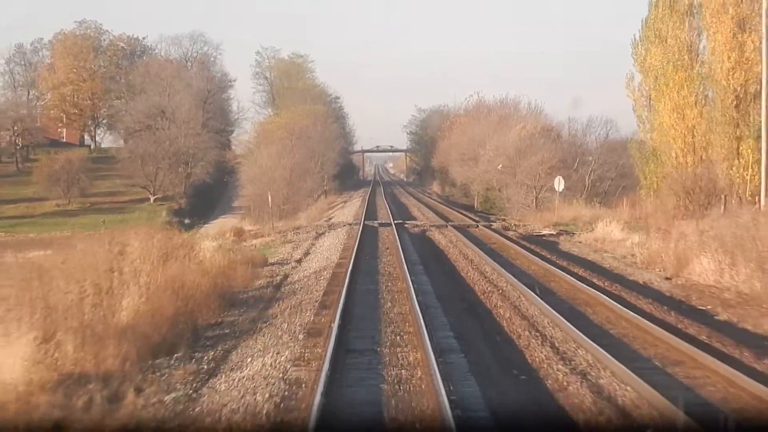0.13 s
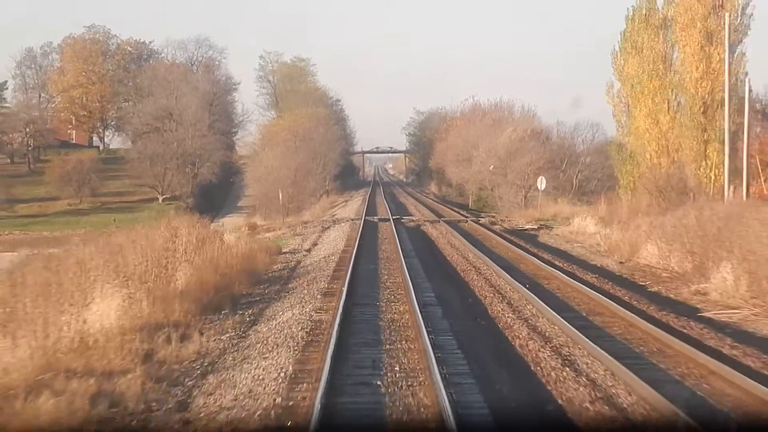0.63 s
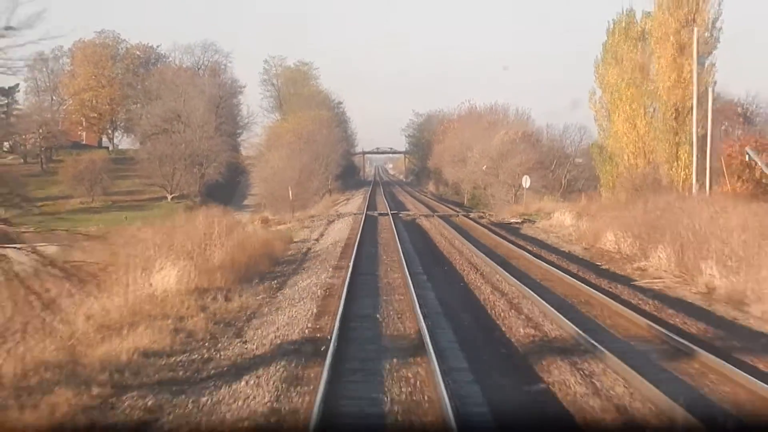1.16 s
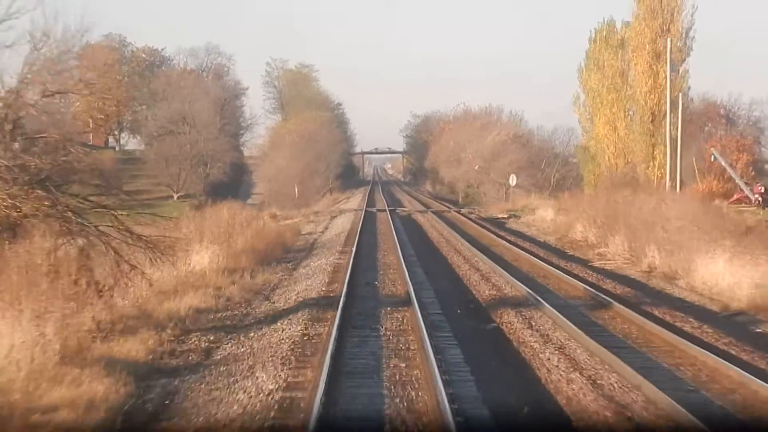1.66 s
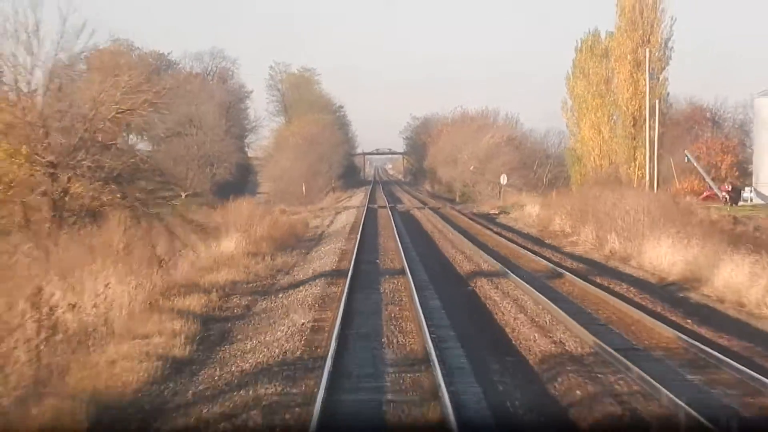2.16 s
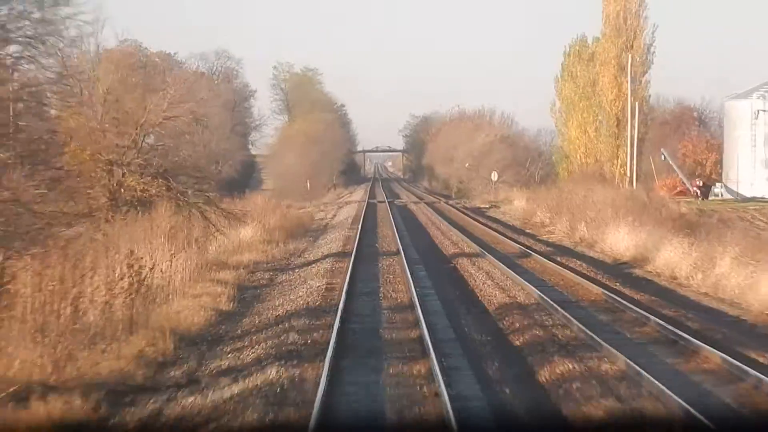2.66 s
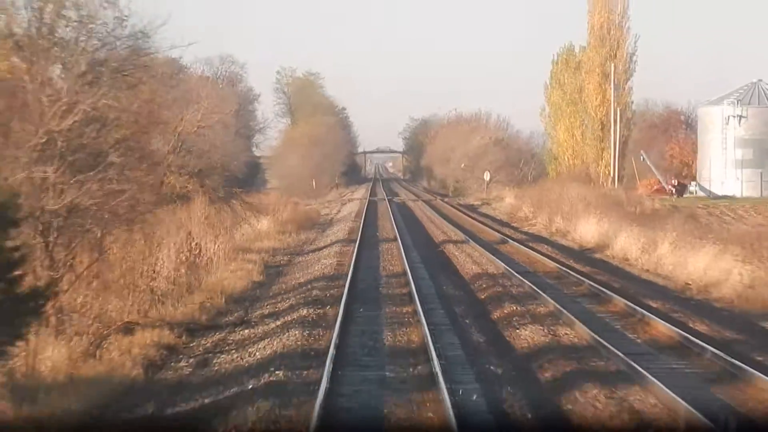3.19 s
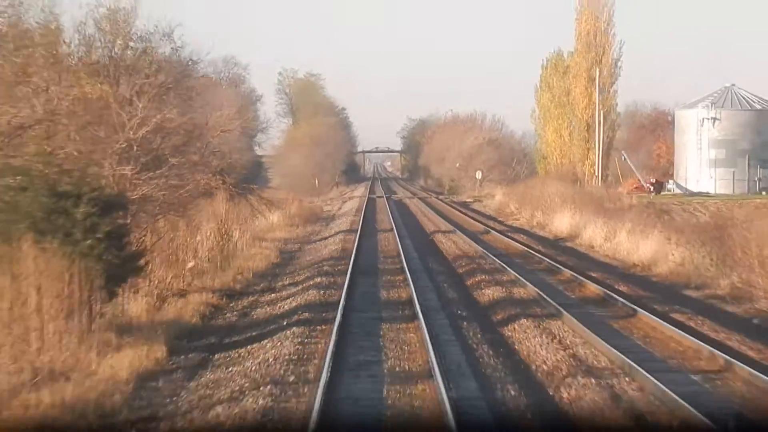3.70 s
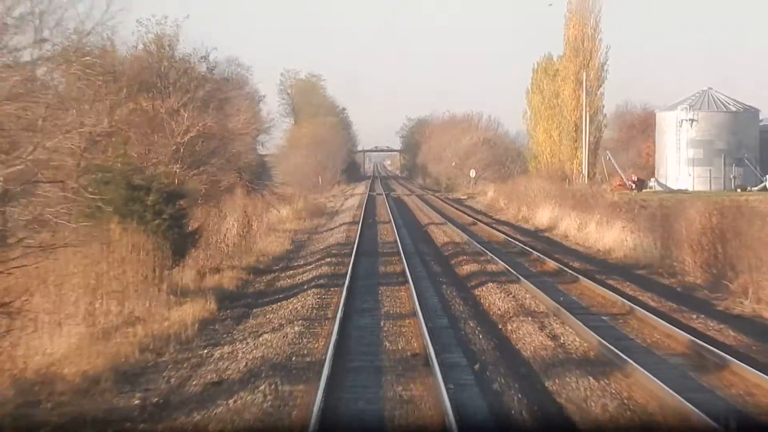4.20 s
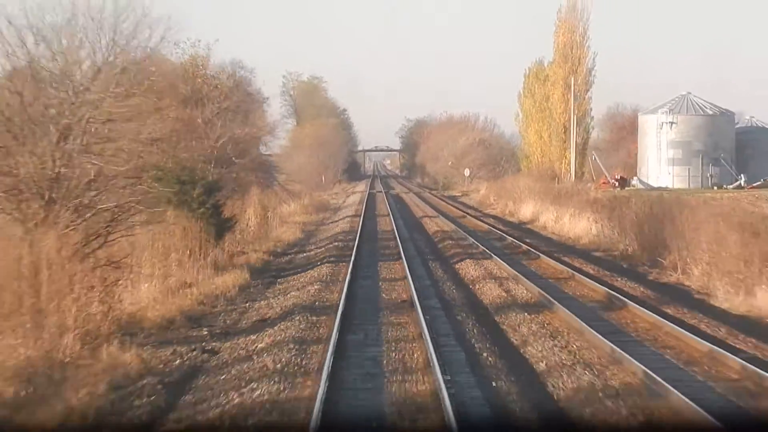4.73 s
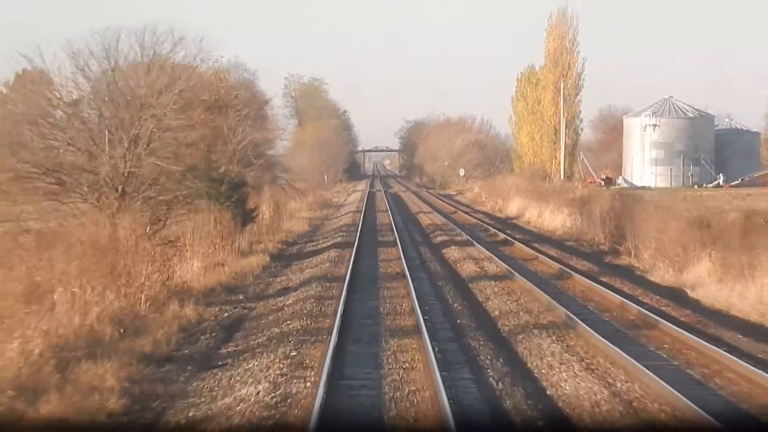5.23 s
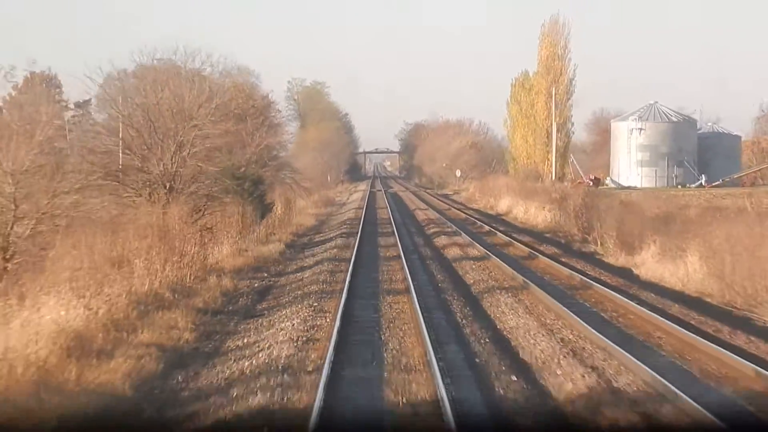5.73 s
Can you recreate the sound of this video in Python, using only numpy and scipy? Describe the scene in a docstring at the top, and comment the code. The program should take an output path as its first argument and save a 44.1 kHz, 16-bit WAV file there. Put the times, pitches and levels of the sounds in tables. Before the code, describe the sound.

Inside a moving passenger train car, a deep engine throb and boomy wheel roar continue under a wavering mid-pitched hum and soft low floor thumps.

```python
"""Inside a passenger car rolling on welded rail, heard in stereo for about six seconds.
From the start an underfloor engine throbs at fixed speed as a sum of sines, a gear hums as one wavering sine,
and wheel roar, shaped noise, comes through the booming floor and walls. From half a second on, jolts swing
the floor as short low bursts, and a peak limiter ducks after those above its ceiling; three faint ticks of
filtered noise fall among them. Past the middle the deepest throb sinks and returns; the hum swells to the end."""
import sys
import numpy as np
from scipy import signal
from scipy.fft import rfft, irfft
from scipy.io import wavfile

SR = 44100
rng = np.random.default_rng(int(sys.argv[2]) if len(sys.argv) > 2 else 0)


def wrap_up_sound(samples):
    """Save the sound to the file named by the first command line argument, as 16-bit audio."""
    columns = np.atleast_2d(samples).T
    # keep every value between -1 and 1, then stretch to whole-number steps
    tamed = np.clip(columns, -1, 1)
    steps = np.round(tamed * 32767).astype(np.int16)
    wavfile.write(sys.argv[1], SR, steps)


def decibels_to_gain(level_db):
    """Convert a level in decibels to a linear amplitude gain (20 dB per decade)."""
    exponent = np.asarray(level_db, float) / 20
    return 10 ** exponent


N = 258426  # samples

# wheel roar without body resonances: (frequency [Hz], relative spectral density [dB])
ROAR_SPECTRUM = [(15, -27), (45, -16.5), (80, -12.5), (160, -16.5), (220, -24), (320, -27), (400, -27),
                 (700, -29.5), (1250, -36), (1600, -34), (2100, -38.5), (2700, -44.5), (5500, -59),
                 (11000, -62), (13000, -65.5), (15000, -77), (16000, -84)]
# body resonances excited by the roar: (frequency [Hz], width [Hz], power added, relative to the roar [dB])
BODY_MODES = [(98.7, 18.8, 8.5), (127.6, 15.2, 6), (213.5, 6.7, -2), (268, 12.6, 6), (352.3, 18, 9.5),
              (400, 7.6, -1), (429.4, 10.5, 10.5), (440.3, 16, 9.5), (469, 34, 3.5), (498.4, 11.6, 7.5),
              (547, 8, 4), (773, 7, 6.5), (868, 49, 0.5), (941, 30, 5.5), (1036, 73, 3), (1417, 19, 7.5),
              (1475, 39, 3), (1920, 21, 7), (2064, 26, 4.5)]
# correlation of left and right roar ahead of the cabin: (frequency [Hz], likeness [0 to 1])
STEREO_LIKENESS = [(60, 1.0), (130, 0.98), (290, 0.94), (640, 1), (1410, 0.53), (2200, 0.13), (3100, 0.062),
                   (6820, 0.01), (15000, 0.03)]
ROAR_DB = -14  # mean rms level ahead of the stereo tilt
CABIN_T60_S, CABIN_DB = 0.3, -10  # decay time; tail energy against direct sound, ahead of its bass cut

# ticks of a loose fitting: (time [s], noise level at onset ahead of the band-pass [dB])
FITTING_TICKS = [(.665, -34), (1.83, -40), (3.55, -39)]

# swells added to the resting gear hum: (start [s], length [s], rms level of the full swell [dB])
GEAR_SWELLS = [(0.0, 0.49, -26.5), (0.617, 0.16, -26), (0.995, 0.14, -28.5), (1.716, 0.31, -30),
               (2.055, 0.13, -24.5), (2.365, 0.42, -32), (3.23, 0.26, -27.5), (3.594, 0.18, -28),
               (4.5, 0.16, -29), (4.938, 0.082, -22), (5.17, 0.64, -23)]
HUM_REST_DB, HUM_EDGE_S = -36.5, 0.039  # mean rms level at rest; time constant of the swell edges
HUM_HZ, HUM_CREEP_HZ_PER_S, HUM_WAVER_HZ = 467.0, 0.3007, 0.83

ENGINE_HZ = 12.605  # shaft speed
# engine orders: (multiple of the shaft speed [1], mean rms level ahead of lull and stereo tilt [dB])
ENGINE_ORDERS = [(1, -55.5), (2, -25.5), (3, -28), (4, -42), (5, -22.5), (6, -31), (7, -16.5), (8, -26.5),
                 (44, -37), (129, -52), (160, -45), (165, -49)]
# the deepest throb sinks for a while: centre, Gaussian spread, depth, upper frequency limit
LULL_AT_S, LULL_SPREAD_S, LULL_DB, LULL_BELOW_HZ = 3.6, 0.55, -4, 45

# jolts from the track: (time [s], peak level of the swing ahead of tilt and limiter [dB])
TRACK_JOLTS = [(0.465, -2), (1.555, -3.5), (1.839, -2), (1.96, 0.5), (2.277, -1.5), (2.815, -2),
               (2.958, 1.5), (3.326, -2.5), (3.935, -1), (4.078, 1.5), (4.408, -0.5), (4.746, -1.5),
               (4.963, 0.5), (5.221, -2.5), (5.369, -1.5), (5.572, -2.5)]
FLOOR_HZ, JOLT_SPREAD_S = 94.8, 0.011  # floor resonance; Gaussian spread of one jolt
JOLT_DAMPING = 0.71  # share of the steady boom removed at the height of a jolt

# level difference between the ears: (frequency [Hz], left minus right [dB])
STEREO_TILT = [(60, -3.5), (180, -3), (550, -3.5), (1650, -4.5), (4970, -4.0), (15000, -1)]
CEILING_DB, RELEASE_DB_PER_S, ATTACK_S = -2, 17.5, 0.00072  # peak limiter
# narrow gaps in the microphone chain: (frequency [Hz], width [Hz], gain at the centre [dB])
MICROPHONE_NOTCHES = [(2500, 180, -16), (7500, 200, -22)]


def at_hz(points, hz):
    """Logarithmic frequency scale: table values are interpolated linearly in log frequency."""
    table = np.array(points)
    return np.interp(np.log(hz), np.log(table[:, 0]), table[:, 1])


def drift(rate_hz):
    """Low-passed random process: white noise through two equal poles wanders slowly with spread 1."""
    hop = 40  # samples per slow step
    r = np.exp(-2 * np.pi * rate_hz * hop / SR)
    noise = rng.standard_normal(N // hop + 4002)
    slow = signal.lfilter([1], [1, -2 * r, r * r], noise)[4000:]  # start-up dropped
    slow = (slow - slow.mean()) / slow.std()
    return np.interp(np.arange(N) / hop, np.arange(len(slow)), slow)


def tone(hz, rms_db):
    """Simple harmonic motion: a sine of given rms level and chance phase."""
    cycles = hz * np.arange(N) / SR + rng.random()
    return np.sqrt(2) * decibels_to_gain(rms_db) * np.sin(2 * np.pi * cycles)


def cabin(hz):
    """Reverberation: direct sound plus a diffuse decaying tail per ear ripples the spectrum above the bass."""
    t = np.arange(SR // 2) / SR
    tail = rng.standard_normal((2, SR // 2)) * decibels_to_gain(-60 * t / CABIN_T60_S)
    tail = decibels_to_gain(CABIN_DB) * tail / np.sqrt(np.sum(tail ** 2, axis=1, keepdims=True))
    bass_cut = hz ** 2 / (hz ** 2 + 500 ** 2)
    return 1 + rfft(tail, N) * bass_cut


def roar():
    """Forced vibration: rolling noise excites body modes, alike at both ears in the bass, diffuse in the treble."""
    hz = np.maximum(np.fft.rfftfreq(N, 1 / SR), 1)
    power = 1
    for mode_hz, width, db in BODY_MODES:
        power = power + decibels_to_gain(db) ** 2 / (1 + (2 * (hz - mode_hz) / width) ** 2) ** 2
    colour = decibels_to_gain(at_hz(ROAR_SPECTRUM, hz)) * np.sqrt(power) * (hz > 8)
    alike = np.clip(at_hz(STEREO_LIKENESS, hz), 0, 1)
    mid, side = rfft(rng.standard_normal((2, N)))
    stereo = np.sqrt(1 + alike) * mid + np.sqrt(1 - alike) * side * [[1], [-1]]
    noise = irfft(colour * cabin(hz) * stereo, N)
    return decibels_to_gain(ROAR_DB + 0.38 * drift(3.5)) * noise / noise.std()


def ticks():
    """Impulsive excitation: bright band-limited noise dies exponentially within some hundredths of a second."""
    t = np.arange(N) / SR
    envelope = np.zeros(N)
    for start, db in FITTING_TICKS:
        envelope += decibels_to_gain(db) * (t > start) * np.exp(-np.maximum(t - start, 0) / 0.011)
    bright = signal.butter(2, [7000, 14000], "band", fs=SR, output="sos")
    return envelope * signal.sosfilt(bright, rng.standard_normal((2, N)))


def hum():
    """Amplitude and frequency modulation: a gear tone swells with soft edges, creeps up in pitch and wavers."""
    t = np.arange(N) / SR
    level = decibels_to_gain(HUM_REST_DB)
    for start, length, db in GEAR_SWELLS:
        rise = np.tanh((t - start) / HUM_EDGE_S)
        fall = np.tanh((t - start - length) / HUM_EDGE_S)
        level = level + decibels_to_gain(db) * 0.5 * (rise - fall)
    hz = HUM_HZ + HUM_CREEP_HZ_PER_S * t + HUM_WAVER_HZ * drift(3.4)
    cycles = np.cumsum(hz) / SR + rng.random()
    return np.sqrt(2) * level * decibels_to_gain(1.2 * drift(6.5)) * np.sin(2 * np.pi * cycles)


def engine():
    """Harmonic series: whole multiples of the shaft speed waver in level, and the deepest sink for a while."""
    t = np.arange(N) / SR
    lull_db = LULL_DB * np.exp(-0.5 * ((t - LULL_AT_S) / LULL_SPREAD_S) ** 2)
    throb = np.zeros(N)
    for order, db in ENGINE_ORDERS:
        hz = order * ENGINE_HZ
        throb += tone(hz, db + 1.14 * drift(1.2) + lull_db * (hz < LULL_BELOW_HZ))
    return throb


def jolts(steady):
    """Transient resonance: a jolt swings the floor a few cycles and meanwhile takes over from the steady boom."""
    t = np.arange(N) / SR
    swing, grip = np.zeros(N), np.zeros(N)
    for centre, db in TRACK_JOLTS:
        swell = np.exp(-0.5 * ((t - centre) / JOLT_SPREAD_S) ** 2)
        direction = rng.choice([-1, 1])
        swing += direction * decibels_to_gain(db) * swell * np.cos(2 * np.pi * FLOOR_HZ * (t - centre))
        grip += swell
    low_pass = signal.butter(2, 180, fs=SR, output="sos")
    boom = signal.sosfiltfilt(low_pass, steady)
    return swing - JOLT_DAMPING * grip * boom


def scene():
    """Superposition: all sources add, then a level difference between the ears favours the right side."""
    steady = engine() + hum() + roar()
    car = steady + jolts(steady) + ticks()
    tilt_db = at_hz(STEREO_TILT, np.maximum(np.fft.rfftfreq(N, 1 / SR), 1))
    return irfft(rfft(car) * decibels_to_gain(tilt_db * [[0.5], [-0.5]]), N)


def limiter(x):
    """Peak limiting: peaks over the ceiling pull the gain down fast; it recovers at a steady dB rate."""
    peak_db = 20 * np.log10(np.abs(x).max(axis=0) + 1e-9)
    over_db = np.maximum(peak_db - CEILING_DB, 0)
    # a running maximum against a rising ramp holds each peak, then lets go linearly in dB
    ramp = RELEASE_DB_PER_S * np.arange(N) / SR
    held_db = np.maximum(np.maximum.accumulate(over_db + ramp) - ramp, 0)
    r = np.exp(-1 / (ATTACK_S * SR))
    ducked = x * decibels_to_gain(-signal.lfilter([1 - r], [1, -r], held_db))
    return np.clip(ducked, -0.96, 0.96)


def notches(x):
    """Band rejection: a notch mixed with its own residue leaves a narrow gap of finite depth."""
    for hz, width, depth_db in MICROPHONE_NOTCHES:
        notched = signal.lfilter(*signal.iirnotch(hz, hz / width, SR), x)
        x = notched + decibels_to_gain(depth_db) * (x - notched)
    return x


def band_limit(x):
    """A steep low-pass at the top of the band."""
    return signal.sosfilt(signal.butter(12, 15620, fs=SR, output="sos"), x)


def record(dry):
    """Signal chain in series: the limiter acts first, then the narrow gaps of the microphone chain."""
    mix = notches(limiter(dry))
    return band_limit(mix)


dry = scene()
out = record(dry)
wrap_up_sound(out)
```